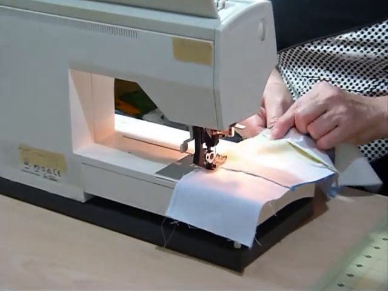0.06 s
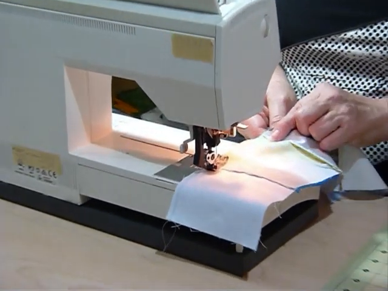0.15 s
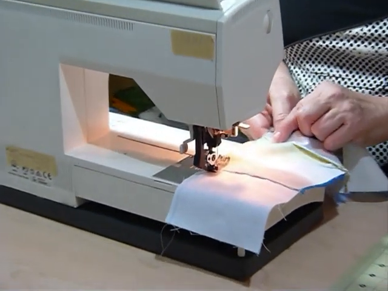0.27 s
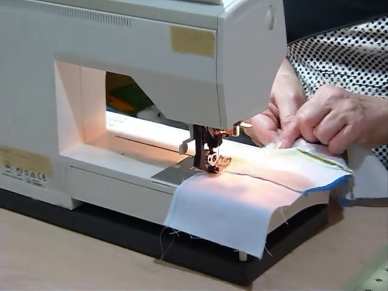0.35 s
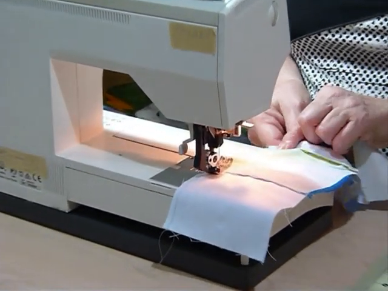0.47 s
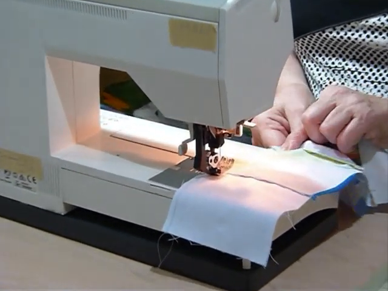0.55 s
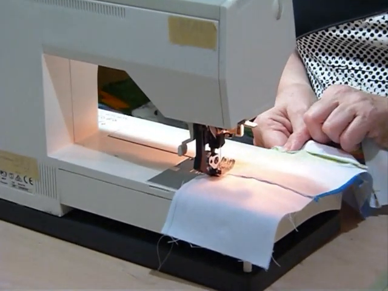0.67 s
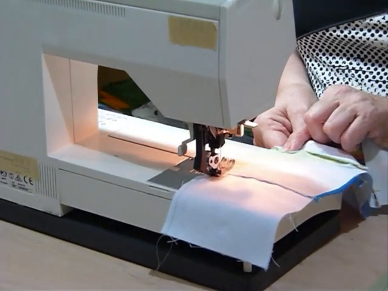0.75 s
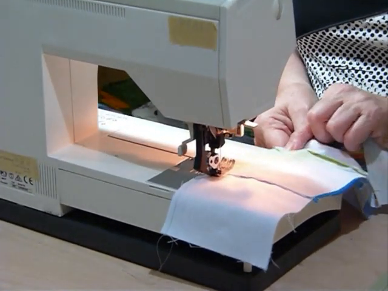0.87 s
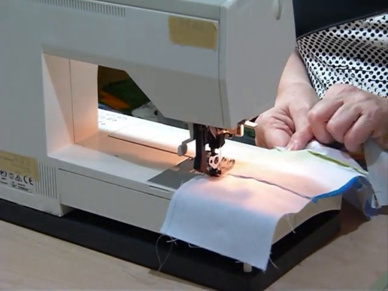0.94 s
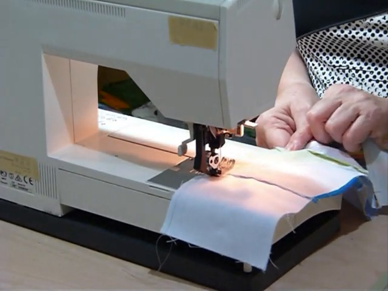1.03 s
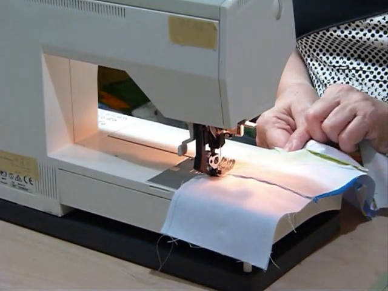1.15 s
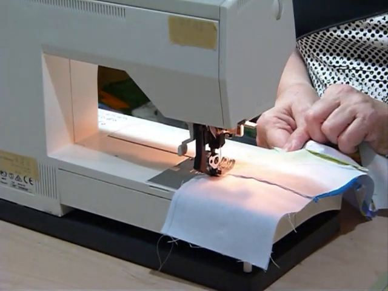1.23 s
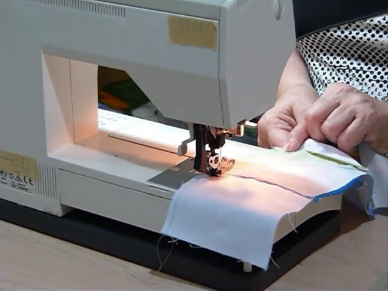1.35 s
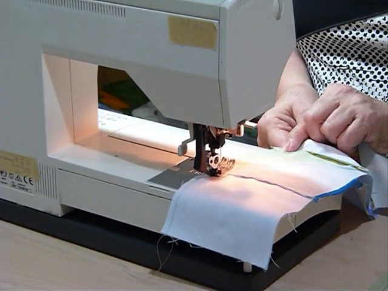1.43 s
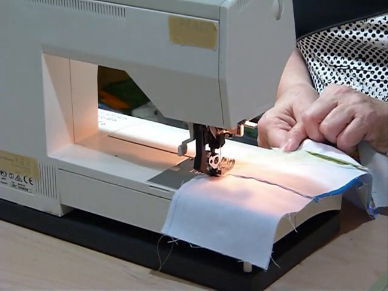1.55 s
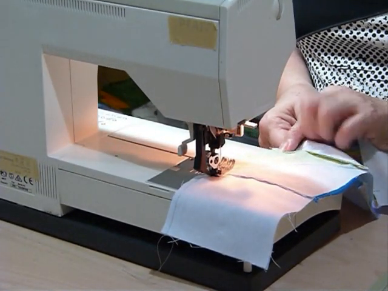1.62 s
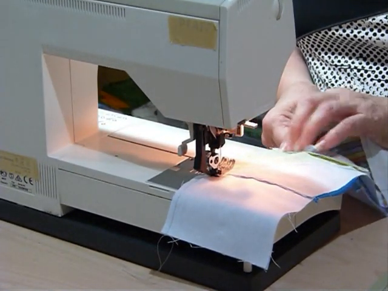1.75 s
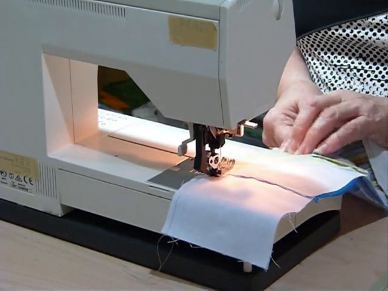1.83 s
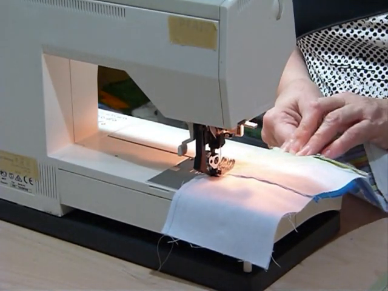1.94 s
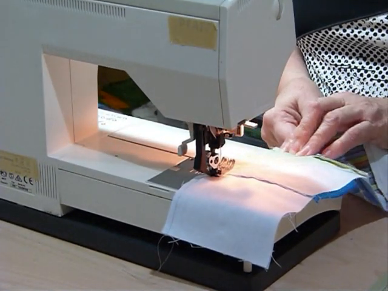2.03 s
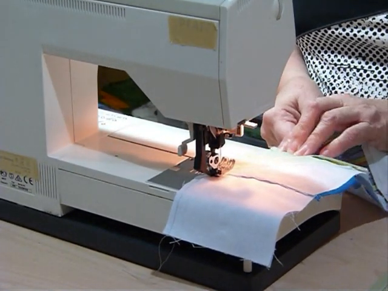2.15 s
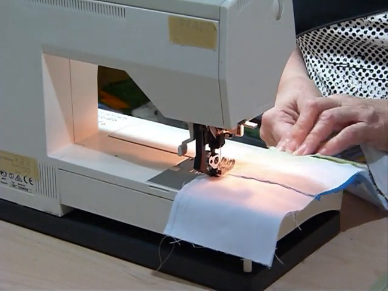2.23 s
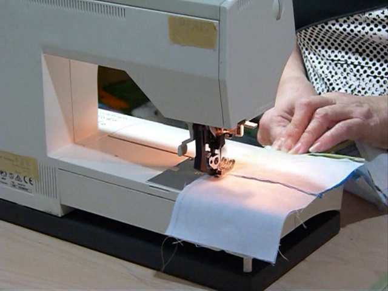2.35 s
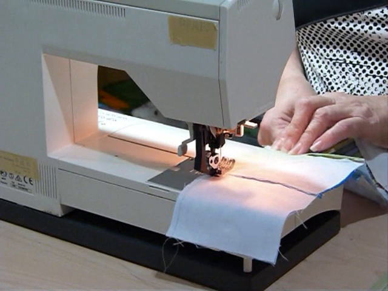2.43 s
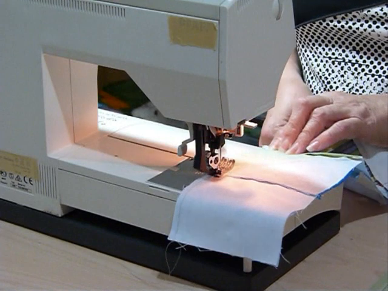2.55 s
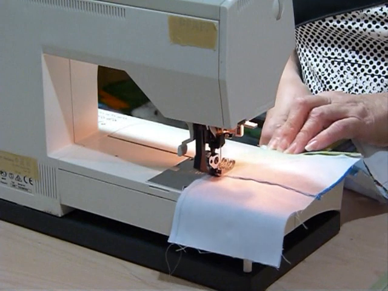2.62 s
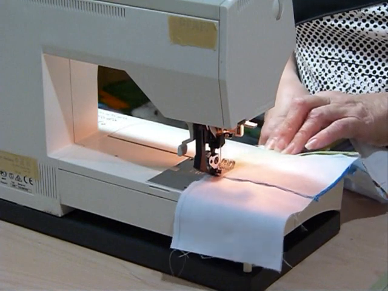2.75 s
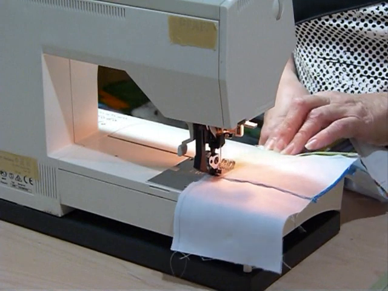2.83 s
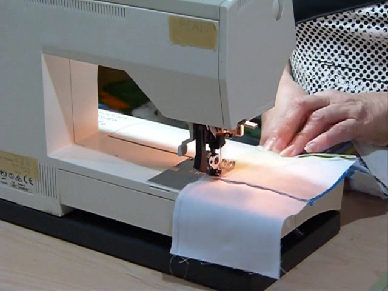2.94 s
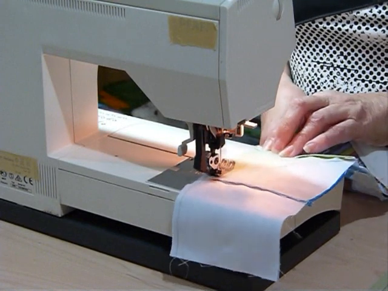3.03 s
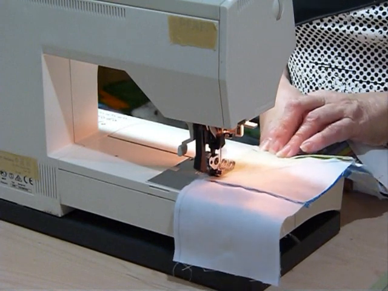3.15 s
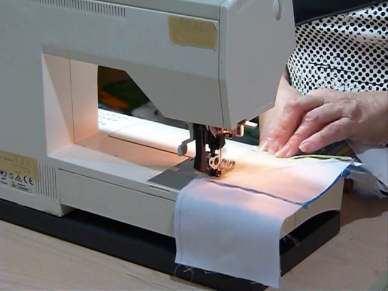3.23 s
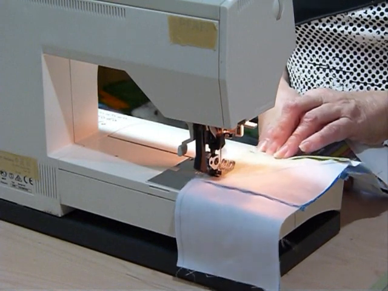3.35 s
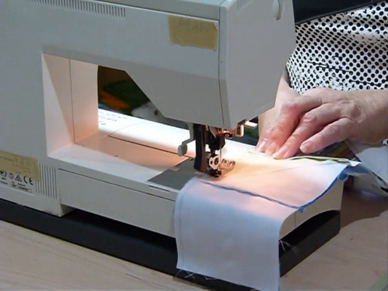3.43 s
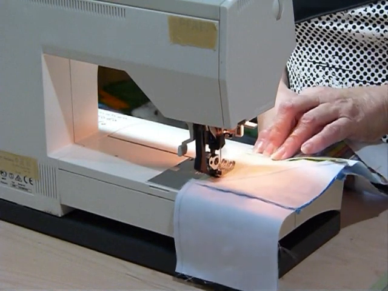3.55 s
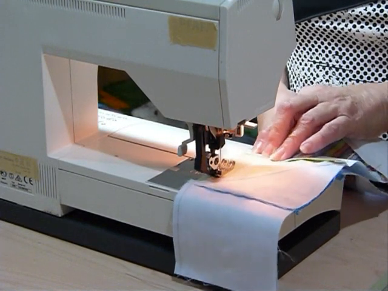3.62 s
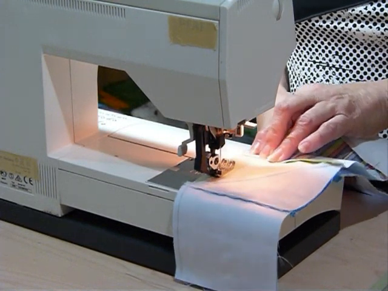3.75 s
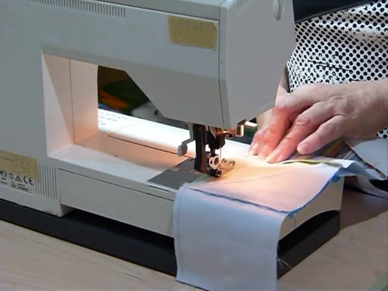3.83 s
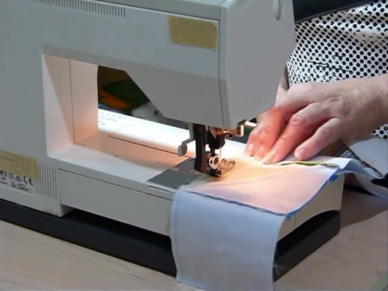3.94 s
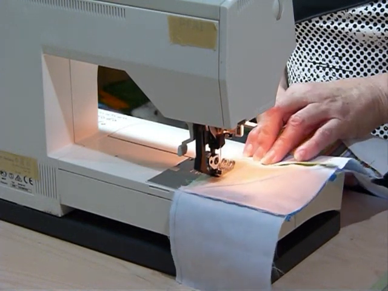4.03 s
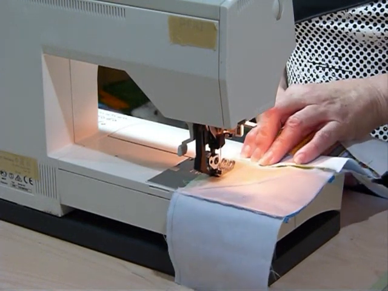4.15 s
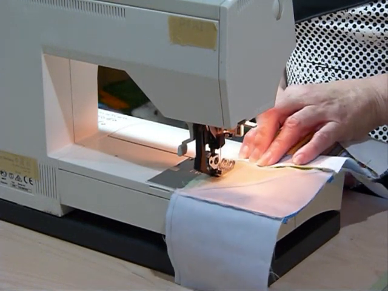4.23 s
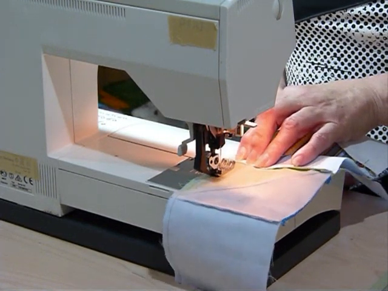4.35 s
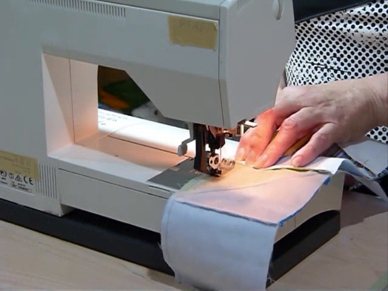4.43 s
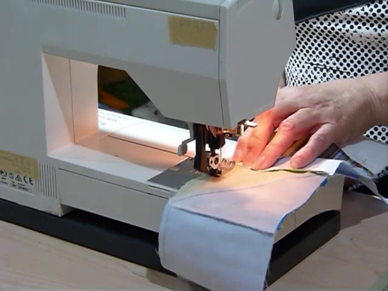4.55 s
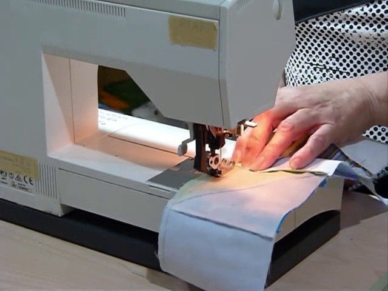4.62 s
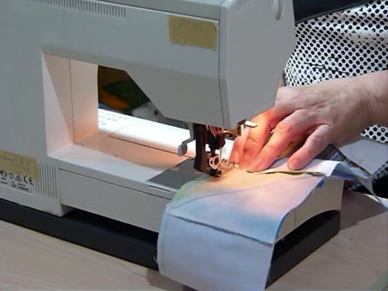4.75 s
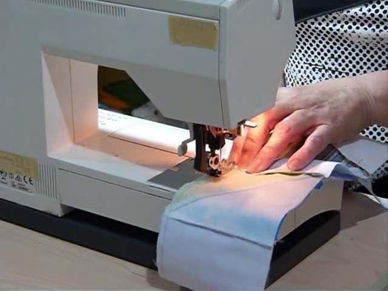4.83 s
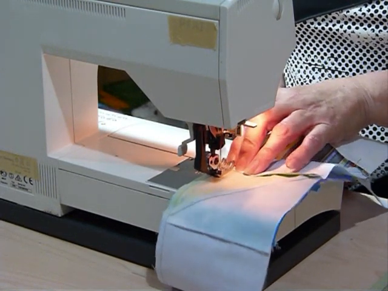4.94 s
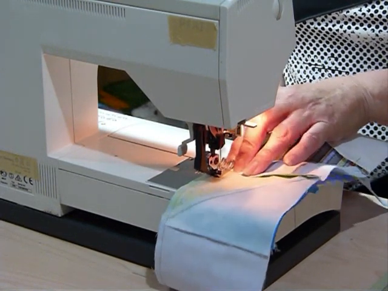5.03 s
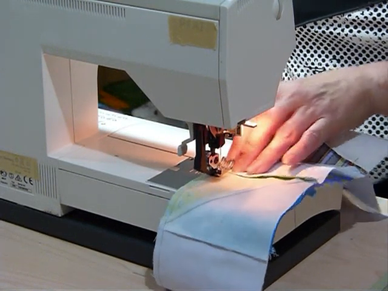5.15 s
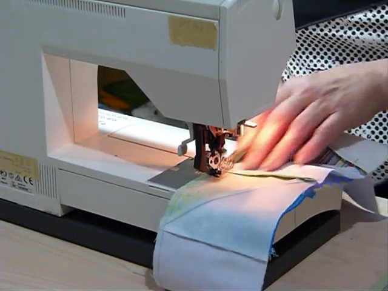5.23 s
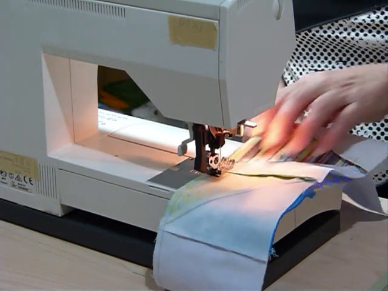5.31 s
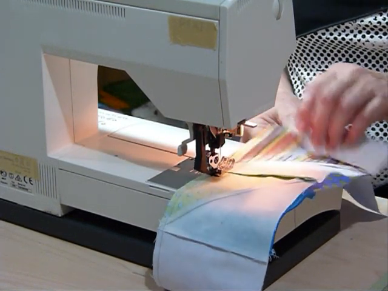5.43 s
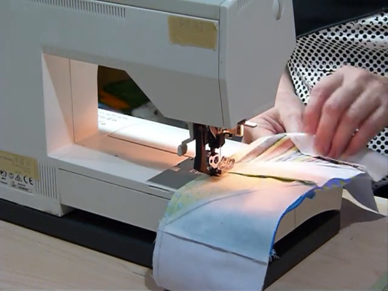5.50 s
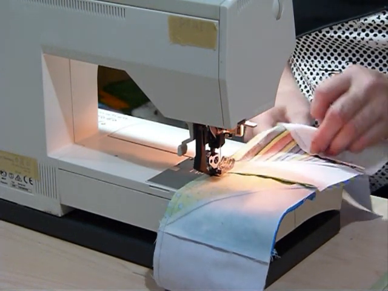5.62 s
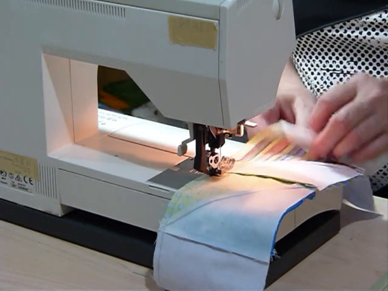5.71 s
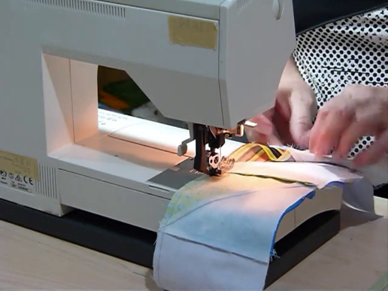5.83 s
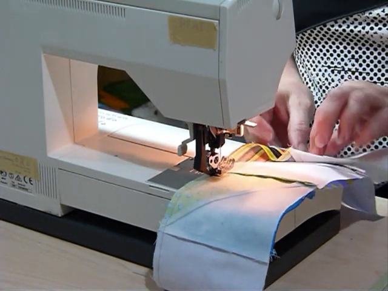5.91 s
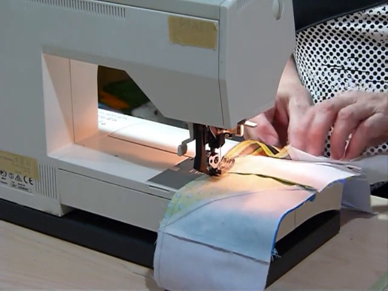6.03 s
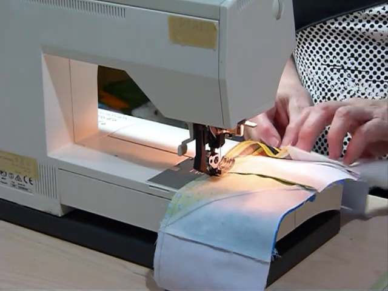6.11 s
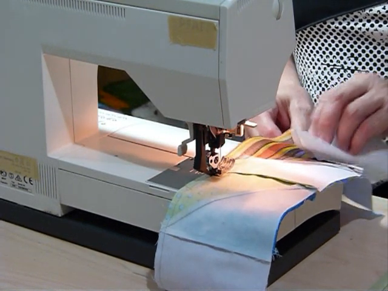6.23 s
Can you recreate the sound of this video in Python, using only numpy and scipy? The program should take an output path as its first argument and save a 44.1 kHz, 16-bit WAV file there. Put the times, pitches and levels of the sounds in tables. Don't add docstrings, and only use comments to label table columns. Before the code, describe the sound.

In a quiet room, hands shift cloth with soft rustles, a rapid faint ticking like a pin over ribs, and small knocks on metal. An electric sewing machine at arm's length groans, then hammers through one fast, steady run of stitches with motor whirr, metallic rattle and thin whine. It slows, clunks to a stop with a short thread hiss, and quiet fabric movement returns. Close stereo microphones, slight room reflections.

```python
import sys
import numpy as np
from scipy import signal
from scipy.fft import rfft, irfft, next_fast_len
from scipy.io import wavfile
from scipy.ndimage import uniform_filter1d

SR = 44100
rng = np.random.default_rng(int(sys.argv[2]) if len(sys.argv) > 2 else 0)


def invert_db(x):
    u = np.asarray(x, float) / 20
    return 10 ** u


def dump(signal):
    limited = np.clip(np.atleast_2d(signal).T, -1, 1)
    pcm = np.round(limited * 32767).astype(np.int16)
    wavfile.write(sys.argv[1], SR, pcm)


N = 276488
TIME = np.arange(N) / SR
STITCHES = 45


def evened(x):
    return x / np.sqrt(np.mean(x ** 2) + 1e-20)


def evened_at_speed(x):
    return x / x[3 * SR:5 * SR].std()


def read(points, hz):
    f, value = np.transpose(points)
    return np.interp(np.log(hz + 1), np.log(f + 1), value)


def curves(rows, off_db=-60):
    s, *columns = np.transpose(rows)
    gate = np.where((TIME < s[0]) | (TIME > s[-1]), off_db, 0)
    return [np.interp(TIME, s, c) + gate for c in columns]


def band(x, lo_hz, hi_hz):
    return signal.sosfilt(signal.butter(2, [lo_hz, min(hi_hz, SR / 2.2)], "band", fs=SR, output="sos"), x)


def slow_noise(size):
    return evened(uniform_filter1d(rng.standard_normal(N), size=size))


def noise(spectrum, same, patchy_db):
    frames, hz = N // 256 + 5, np.fft.rfftfreq(1024, 1 / SR)
    a, b, c, d, patches = rng.standard_normal((frames, 513, 5)).T
    patches = evened(uniform_filter1d(uniform_filter1d(patches, 10, 0), 8, 1))
    like = np.clip(read(same, hz), -1, 1)[:, None]
    left = a + 1j * b
    right = like * left + np.sqrt(1 - like ** 2) * (c + 1j * d)
    z = np.array([left, right]) * invert_db(read(spectrum, hz)[:, None] + patchy_db * patches)
    return evened(signal.istft(z, nperseg=1024, noverlap=768)[1][:, :N])


def resonate(x, hz, width_hz):
    turn, r = np.exp(2j * np.pi * np.cumsum(hz) / SR), np.exp(-np.pi * width_hz / SR)
    smooth = signal.lfilter([1 - r], [1, -r], x / turn)
    smooth = signal.lfilter([1 - r], [1, -r], smooth)
    return (turn * smooth).real


def rings(modes):
    t = np.arange(SR // 3) / SR
    ring = np.zeros(len(t))
    for k, (hz, db, t60) in enumerate(modes):
        ring += (-1) ** k * invert_db(db - 60 * t / t60) * np.sin(2 * np.pi * hz * t)
    return ring / np.linalg.norm(ring)


def strikes(s, sizes):
    train = np.zeros(N)
    np.add.at(train, np.clip((s * SR).astype(int), 0, N - 1), sizes)
    return train


def struck(train, response):
    return signal.oaconvolve(train, response)[:N]


def reflections(x, t60=0.26, lo_hz=1500):
    size = SR // 2
    taps = rng.choice([-1., 1.], (2, size)) * (rng.random((2, size)) < .05)
    taps *= invert_db(-60 * np.arange(size) / SR / t60)
    taps = band(band(taps, lo_hz, 8100), lo_hz, 6300)
    return signal.fftconvolve(x[None], taps / np.linalg.norm(taps, axis=1)[:, None], axes=1)[:, :N]


# (frequency [Hz], left over right [dB])
NEAR_SIDE = [(60, -1.0), (160, -1.5), (420, -1.0), (1100, -0.5), (2900, 1.5), (7640, 2.0)]
# (frequency [Hz], left lead [rad])
NEAR_LEAD = [(0, 0), (100, -.05), (400, -.2), (1460, -.7), (3300, -.7), (5000, -.4), (7800, 0)]


def ports(pair, side=NEAR_SIDE, lead=NEAR_LEAD):
    size = next_fast_len(N)
    hz = np.fft.rfftfreq(size, 1 / SR)
    left = invert_db(read(side, hz) / 2) * np.exp(.5j * read(lead, hz))
    return irfft(rfft(pair, size) * np.array([left, 1 / left]), size)[:, :N]


# (angle [turn], dull level [dB], sharp level [dB])
CAMS = [(.97, -3, 0), (.06, 0, -12), (.02, -6, -3), (.185, -6, -1), (.23, -3, -3), (.31, -8, -8),
        (.41, -4, -6), (.64, -8, -7), (.78, -6, -8), (.86, -6, -8)]


def machine():
    turns, speed = shaft()
    effort_db, steady_s = motor_effort(), np.clip(TIME - 3, 0, 2)
    hiss_db = effort_db - 6 - 3.5 * (1 - speed) + 0.96 * steady_s
    angle, dull_db, sharp_db = np.transpose(CAMS)
    wear = rng.standard_normal((STITCHES, len(CAMS), 2))
    cams_at = stitch_times(angle, turns)
    lift = puffs(cams_at, sharp_db + 1.9 * wear[..., 1])
    throb = puffs(cams_at, dull_db + 0.59 * wear[..., 0])
    flicker = invert_db(0.43 * slow_noise(300))

    near = casing(turns, cams_at, dull_db + 0.95 * wear[..., 0]) * invert_db(effort_db - 5.5)
    near += table_shake(turns, wear[:, 0, 0]) * invert_db(effort_db + shake_level(speed))
    near += gear(turns) * invert_db(effort_db - 8)
    near += feed_taps(turns) * invert_db(effort_db - 20.5) * speed ** 2
    near += needle_plate() * invert_db(effort_db - 12.5) * speed ** 7.1
    near += shaft_orders(turns, speed) + motor_hum(turns, speed, steady_s)
    near += whine() * invert_db(hiss_db - 1.5) * speed ** 25
    near += hook(lift, flicker) * invert_db(hiss_db - 14.0)
    near += clacks() + snaps() + belt() + thread_release()
    air = hiss(lift, flicker) * invert_db(hiss_db - 3.0)
    air += whirr(turns, throb, flicker) * invert_db(effort_db - 4.5)
    return ports(near + air) + invert_db(-9.5) * reflections(near)


# (time [s], angle since the start [turn])
SHAFT = [(2.2, -.3), (2.33, 0), (2.462, 1), (2.563, 2), (2.641, 3), (2.711, 4), (2.78, 5), (2.8465, 6),
         (2.978, 8), (3.3021, 13), (3.4946, 16), (4.9645, 39), (5.0285, 40), (5.0945, 41), (5.165, 42),
         (5.25, 43), (5.36, 44), (5.5, 44.5)]


def shaft():
    turns = uniform_filter1d(np.interp(TIME, *np.transpose(SHAFT)), size=2600)
    rate = np.gradient(turns)
    return turns, rate / rate.max()


def stitch_times(fraction, turns):
    whole = np.arange(STITCHES)[:, None]
    return np.interp(whole + (fraction + .1) % 1 - .1, turns, TIME).ravel()


# (time [s], whirr level [dB])
EFFORT = [(2.285, -64), (2.344, -29), (2.43, -35), (2.5, -25), (2.56, -26), (2.64, -25.5), (2.96, -24.5),
          (4.37, -25), (4.92, -25), (5.1, -26.5), (5.266, -33), (5.3, -36.5), (5.312, -36.5), (5.34, -40),
          (5.408, -46), (5.488, -46), (5.497, -39.5), (5.72, -60.5)]


def motor_effort():
    return curves(EFFORT)[0]


# (frequency [Hz], level [dB], t60 [s])
CASING = [(500, -0.5, 0.57), (557.4, 3, 0.47), (615, 3.5, 0.54), (653, 5.5, 0.32), (700.4, 4, 0.51),
          (850, 6, 0.17), (898.4, 7.5, 0.12), (1041, 1.5, 0.19), (1128, 6, 0.26), (1230, 6.5, 0.28),
          (1340, 8.5, 0.072), (1360, -10, 0.27), (760, 8.5, 0.31), (1900, -9, 0.035)]


def casing(turns, cams_at, cam_db):
    teeth, bite = rng.random(40), rng.standard_normal(40)
    blows = strikes(cams_at, invert_db(cam_db).ravel())
    blows += strikes(stitch_times(teeth, turns), np.tile(bite, STITCHES))
    return evened_at_speed(band(struck(blows, rings(CASING)), 400, 3700))


# (frequency [Hz], level [dB], t60 [s])
BED = [(281.5, 2.5, 0.3), (325.8, -3.5, 0.5), (393.4, 9, 0.21), (473.8, -2.5, 0.91)]


def table_shake(turns, wear):
    blows = strikes(stitch_times(0.035, turns), invert_db(1.4 * wear))
    return evened_at_speed(band(struck(blows, rings(BED)), 250, 600))


def shake_level(speed):
    warming = np.exp(-np.clip(TIME - 2.75, 0, 9) / 0.14)
    return -9 - 13.5 * np.sqrt(abs(1 - speed)) - 5 * warming


def gear(turns):
    tooth = rng.random(120)
    load = uniform_filter1d(rng.standard_normal((STITCHES, 120)), size=9, axis=0)
    load = load * invert_db(-3.5 * np.cos(2 * np.pi * (tooth - .08)))
    bites = strikes(stitch_times(tooth, turns), load.ravel())
    return evened_at_speed(band(band(bites, 500, 1500), 500, 1500))


# (angle [turn], level [dB])
TAPS = [(0.966, -2.5), (.025, -4), (0.171, -4), (.31, -2.5), (0.406, -1), (.53, -7.5), (.62, -6), (.75, -7),
        (0.847, -5)]


def feed_taps(turns):
    place, tap_db = np.transpose(TAPS)
    lo_hz, hi_hz = 1500, 3070
    t = TIME[:900]
    tap = invert_db(-60 * t / 0.009) * np.cos(np.pi * (lo_hz + hi_hz) * t)
    hits = invert_db(tap_db + 4 * rng.standard_normal((STITCHES, len(TAPS))))
    train = strikes(stitch_times(place, turns), hits.ravel())
    return evened_at_speed(band(struck(train, tap), lo_hz, hi_hz))


def needle_plate():
    return evened(resonate(rng.standard_normal(N), np.full(N, 1868), width_hz=280))


# (order [per turn], level [dB])
SHAFT_ORDERS = [(2, -62), (3, -54), (5, -74), (7, -53), (11, -55.5), (12, -56.5), (13, -50)]


def shaft_orders(turns, speed):
    out = np.zeros(N)
    for order, db in SHAFT_ORDERS:
        out += invert_db(db + 1.0) * speed ** 8 * np.cos(2 * np.pi * order * (turns + rng.random()))
    return out


def motor_hum(turns, speed, steady_s):
    pedal = .5 - 0.52 * np.tanh((TIME - 5.115) / .012)
    level = invert_db(-36 - 0.96 * steady_s) * abs(speed) ** 10.5
    return level * pedal * np.cos(2 * np.pi * 8 * turns)


# (frequency [Hz], level against the hiss [dB])
WHINE = [(5455, -22), (5580, -24), (5637, -21), (5734, -22), (5796, -21), (5878, -15.5), (5958, -25)]


def whine():
    step = 64
    slow = evened(uniform_filter1d(rng.standard_normal((2, len(WHINE), N // step + 1)), size=40))
    wanders, wavers = np.repeat(slow, step, axis=2)[..., :N]
    out = np.zeros(N)
    for (hz, db), wander, waver in zip(WHINE, wanders, wavers):
        out += invert_db(db + 2.5 * waver) * np.cos(2 * np.pi * np.cumsum(hz + 5 * wander) / SR)
    return out


def puffs(s, db):
    t = np.arange(1500) / SR
    puff = 2 * np.exp(-t / 0.0026) * (1 - np.exp(-t / 0.0023))
    return struck(strikes(s, invert_db(db).ravel()), puff)


# (frequency [Hz], level [dB], t60 [s])
HOOK = [(4360, -7.5, 0.015), (5480, -6, 0.015), (5580, -3.5, 0.03), (5920, -5.5, 0.021)]


def hook(lift, flicker):
    return struck(rng.standard_normal(N) * (.5 + lift) * flicker ** 3, rings(HOOK))


# (frequency [Hz], likeness [0-1])
NEAR_SAME = [(60, .99), (420, .97), (1100, .82), (2900, .55), (7640, .7)]
# (frequency [Hz], level [dB per Hz])
HISS = [(880, -19.5), (1500, -2), (1680, -1.5), (1860, -1), (2180, -4.5), (3180, -4.5), (5210, -9.5),
        (5740, -10), (7070, -12), (7900, -30.5), (10300, -58.5), (17400, -120)]


def hiss(lift, flicker):
    return noise(HISS, NEAR_SAME, patchy_db=.8) * (1 + 0.65 * lift) * flicker


# (frequency [Hz], level [dB per Hz])
WHIRR = [(25, -37), (45, -29), (65, -32), (110, -12), (160, -12), (230, -19.5), (300, -1), (360, -7),
         (480, -0.5), (1130, -1), (1400, -2), (1600, -13.5), (2600, -13.5), (3400, -35)]


def whirr(turns, throb, flicker):
    downstroke = invert_db(3 * np.cos(2 * np.pi * (turns - .08)))
    return noise(WHIRR, NEAR_SAME, patchy_db=1.0) * flicker * (1 + 0.14 * throb) * downstroke


# (angle [turn], peak level [dB])
BITE = [(5, -16), (12, -11), (13, -11), (25, -12), (26, -19.5), (41, -24)]
# (angle [turn], extra level [dB])
SEAMS = [(5, 0.5), (6, -7), (10, 6.5), (11, -13), (12, -3.5), (13, 5.5), (14, -17), (15, 2.5), (18, 6),
         (19, -6), (20, -7), (21, -6), (22, 1.5), (24, 2), (25, 4), (26, -19.5), (27, -8), (29, 14),
         (30, -8), (31, -8), (33, -2.5), (34, 2), (38, 8), (39, 7)]
# (angle [turn], lag [s])
CLACK_DELAY = [(5, 0), (7, .008), (10, .004), (12, 0)]
# (time [s], peak level
# [dB], brightness [dB])
MORE_CLACKS = [(2.3, -29, -13.5), (2.355, -29, -21), (2.33, -36.5, 1), (2.341, -30, -12), (2.346, -20, -23),
               (2.381, -20.5, -12), (2.422, -30.5, 3), (2.467, -9, -18), (2.496, -7.5, -20), (2.565, -21.5, -7),
               (2.611, -12, -17.5), (2.646, -12, -12), (2.699, -24, -31), (2.725, -18, -6.5), (3.185, -19, -11),
               (3.202, -17.5, -1.5), (3.636, -10.5, -19.5), (3.779, -11, -25.5), (4.187, -19.5, 0.5),
               (5.119, -12, -7.5), (5.192, -16, -10.5), (5.216, -17.5, -14), (5.259, -32, -4), (3.879, -9, -14.5),
               (3.971, -17, -26), (4.309, -21, -20), (4.772, -14.5, -7), (3.021, -18.5, -22), (2.938, -13, -11)]


def clack_rows():
    turn = np.arange(5, 42)
    db = np.interp(turn, *np.transpose(BITE))
    for seam, extra_db in SEAMS:
        db = db + extra_db * (turn == round(seam))
    s = np.interp(turn, *np.transpose(SHAFT)[::-1]) + 0.002 + np.interp(turn, *np.transpose(CLACK_DELAY))
    edge_db = -28 + 1.5 * rng.standard_normal(len(turn))
    return np.r_[np.c_[s, db, edge_db - db], MORE_CLACKS]


def clacks():
    out, t = np.zeros(N), np.arange(1800) / SR
    edge_lead = 130
    rows = clack_rows()
    grit = rng.standard_normal((len(rows), 2, len(t)))
    fall = np.minimum(t / 0.0032, 1) * invert_db(-60 * t / 0.035) + 0.16 * invert_db(-60 * t / 0.1)
    snap = 0.4 * np.exp(-((t - .003) / 0.001) ** 2)
    for (s, db, bright_db), (dull, sharp) in zip(rows, grit):
        sound = evened(band(dull, 680, 1450)) * np.roll(fall, edge_lead)
        sound += invert_db(bright_db) * evened(band(sharp, 2800, 5600)) * (fall ** 0.59 + snap)
        out[round(s * SR) - 110 - edge_lead:][:len(t)] += invert_db(db - 8.5) * sound
    return out


# (time [s], peak level [dB])
SNAPS = [(2.7813, -28.5), (2.9253, -27), (3.0555, -15), (3.188, -13), (3.3653, -19.5), (3.4295, -18.5),
         (3.5553, -21), (3.6232, -29), (3.8576, -17.5), (3.94, -29), (4.0056, -23.5), (4.0811, -21),
         (4.1769, -28), (4.2587, -23), (4.3248, -21), (4.7082, -23.5), (4.9117, -15), (5.0968, -25),
         (5.4905, -27), (5.502, -36), (.542, -42), (.5455, -41), (.549, -45), (2.3365, -28), (2.458, -26),
         (3.043, -25), (3.491, -22), (3.684, -28), (3.7474, -30), (3.8267, -22), (4.133, -30),
         (4.4518, -20), (4.58, -29.5), (4.8993, -21), (5.1911, -32), (5.2584, -28.5)]


def snaps():
    out, t = np.zeros(N), np.arange(1200) / SR
    for (s, db), grit in zip(SNAPS, rng.standard_normal((len(SNAPS), len(t)))):
        fall = np.minimum(t / 0.00068, 1) * invert_db(db - 10 - 60 * t / 0.03)
        out[round(s * SR) - 30:][:len(t)] += fall * evened(band(grit, 3300, 6800))
    return out


# (time [s], pitch [Hz], level [dB])
BELT = [
    [(2.285, 630, -56), (2.31, 653, -35.5), (2.33, 600, -40.5), (2.36, 716, -30.5), (2.42, 648, -37),
     (2.55, 908, -33)],
    [(5.12, 980, -42), (5.18, 850, -38.5), (5.23, 714, -31.5), (5.27, 632, -51), (5.295, 600, -48),
     (5.32, 600, -39), (5.355, 480, -52), (5.4, 253, -43.5), (5.48, 230, -53)],
    [(5.55, 1900, -78), (5.68, 1780, -60.5), (5.95, 1850, -70.5)],
    [(0, 1140, -63), (.5, 1130, -64), (.7, 1073, -65.5)],
]


def belt():
    out = np.zeros(N)
    for rows in BELT:
        s, hz, db = np.transpose(rows)
        groan = evened(resonate(rng.standard_normal(N), np.interp(TIME, s, hz), .45 * hz.mean()))
        out += groan * invert_db(curves(np.c_[s, db])[0])
    return out


def thread_release():
    start_s, fall_s = 5.492, 0.038
    fall = (TIME > start_s) * np.exp(-abs(TIME - start_s) / fall_s)
    return invert_db(-44.5) * fall * evened(band(rng.standard_normal(N), 2600, 6500))


# (time [s], peak level [dB], pitch [Hz], brightness [dB])
KNOCKS = [(0.07, -41, 315, -4), (0.256, -40, 357, -16), (0.359, -42, 292, -5), (0.542, -35.5, 1120, 0),
          (0.5515, -26, 823, -26), (.5485, -31, 2540, -11), (0.549, -22.5, 1226, -6.5),
          (1.6109, -29, 350, -3.5), (1.611, -32, 847, -8), (1.62, -29.5, 316, -17), (1.634, -35, 800, -16),
          (1.744, -42, 633, -13), (1.929, -25, 500, -10.5), (1.953, -30, 582, -28), (1.978, -37, 550, -24),
          (2.064, -36, 495, -23), (2.095, -34, 241, -21), (5.195, -27.5, 1210, 8.5), (5.258, -31, 650, 9),
          (5.3045, -15.5, 570, -27), (5.318, -20.5, 763, -21), (5.331, -25.5, 297, -25),
          (5.403, -29, 292, -24), (5.266, -22, 665, -19), (5.352, -22.5, 655, -24), (5.385, -29, 500, -14),
          (5.559, -30.5, 1080, -8), (6.0355, -27.5, 1230, -27), (6.037, -38, 1900, -20),
          (6.045, -42, 1500, -18), (6.0341, -29.5, 450, -25), (6.039, -28, 640, -25),
          (6.046, -28.5, 323, -23), (6.062, -28, 600, -22), (6.07, -30, 612, -24), (6.078, -37, 600, -19),
          (6.175, -41, 694, -20), (6.19, -42, 780, -20), (6.209, -49, 770, -17)]
# (time [s], peak level [dB], pitch [Hz])
BUMPS = [(.36, -46, 600), (1.939, -32, 380), (2.311, -38, 127), (2.341, -29.5, 196), (2.401, -36, 131),
         (2.471, -30.5, 201), (2.561, -29.5, 191), (5.152, -35, 126), (5.205, -28, 248),
         (5.313, -34.5, 123), (5.373, -29, 252), (5.398, -31, 256), (0.335, -42, 293), (5.459, -42, 129),
         (5.554, -38.5, 123), (6.049, -36, 116)]


def knocks():
    out, t = np.zeros((2, N)), np.arange(6000) / SR
    rows = [(s, db, hz, 0.083 * (450 / hz) ** 0.59, bright_db) for s, db, hz, bright_db in KNOCKS]
    rows += [(s, db, hz, .19, -31) for s, db, hz in BUMPS]
    pan_db = np.array([[-0.75], [0.75]])
    rise = np.minimum(t / 0.0018, 1)
    grit = rng.standard_normal((len(rows), 2, len(t)))
    for (s, db, hz, t60, bright_db), (body, crack) in zip(rows, grit):
        ring = 0.62 * np.sin(2 * np.pi * hz * t) + 0.38 * evened(band(body, 0.62 * hz, 1.36 * hz))
        sound = ring * invert_db(-60 * t / np.clip(t60, .02, .6))
        crack = evened(band(crack, 740, 3230) + 0.24 * band(crack, 3400, 5700))
        sound += invert_db(bright_db) * crack * invert_db(-60 * t / 0.029)
        part = out[:, round(s * SR) - 20:][:, :len(t)]
        part += invert_db(db - 4.5 + pan_db) * (rise * sound)[:part.shape[1]]
    out += ticks()
    return out + invert_db(-14.5) * reflections(out.mean(0), t60=0.29, lo_hz=600)


# (time [s], peak level [dB], pitch [Hz])
TICKS = [(0.0662, -45, 2600), (.074, -50, 2600), (.085, -47, 2900), (0.0902, -46, 2600), (.094, -50, 1200),
         (0.129, -47, 2330), (.134, -46, 2330), (.149, -48, 1900), (.186, -50, 1150), (.279, -49, 1050),
         (.192, -47, 1200), (.208, -52, 1200), (0.2349, -46, 1800), (0.2897, -47, 2160), (0.301, -49, 2300),
         (0.3162, -44, 1500), (.34, -49, 2500), (.3885, -51, 1750), (0.402, -46, 2200), (.4584, -51, 2290),
         (0.4858, -44, 1900), (.595, -53, 2300), (0.625, -53, 2300), (.648, -59, 1630)]


def ticks():
    out, t = np.zeros(N), np.arange(1200) / SR
    first_s, gap_s, count = .0105, .01398, 47
    ribs, size = rng.standard_normal((count, 2, len(t))), rng.standard_normal(count)
    for k, (low, high) in enumerate(ribs):
        click = evened(band(low, 900, 1300)) + evened(band(high, 1700, 3000))
        fall = np.minimum(t / 0.0006, 1) * invert_db(-55 + size[k] - 60 * t / 0.017)
        out[round((first_s + k * gap_s) * SR) - 40:][:len(t)] += fall * click
    fall = np.minimum(t / 0.0008, 1) * invert_db(-60 * t / 0.025)
    for (s, db, hz), scratch in zip(TICKS, rng.standard_normal((len(TICKS), len(t)))):
        scratch = band(band(scratch, 0.79 * hz, 1.28 * hz), 0.79 * hz, 1.28 * hz)
        out[round(s * SR) - 40:][:len(t)] += invert_db(db - 2) * fall * evened(scratch)
    return out * invert_db(np.array([[1.5], [-1.5]]))


# (frequency [Hz], likeness [0-1])
ROOM_SAME = [(60, 0.79), (160, 1), (420, 0.88), (1100, 0.76), (2900, 0.16), (7640, 0.47)]
# (time [s], pressure level [dB])
FABRIC = [
    [(0.0, -55), (0.48, -53.5), (0.62, -54.5), (0.73, -70), (0.9, -56.5), (0.97, -58.5), (1.22, -51),
     (1.33, -51.5), (1.42, -56), (1.55, -55.5), (1.62, -45.5), (1.74, -51), (1.9, -49.5), (2.0, -48.5),
     (2.17, -49), (2.3, -46)],
    [(5.45, -47.5), (5.598, -47.5), (5.806, -59), (6.02, -60), (6.052, -51), (6.15, -56), (6.19, -51),
     (6.27, -59)],
]
# (frequency [Hz], level [dB per Hz])
DRAG = [(71, -51), (120, -25.5), (177, -10), (206, -3.5), (408, -7.5), (443, -4.5), (2000, -16),
        (2600, -61), (4400, -120)]
# (frequency [Hz], level [dB per Hz])
RUSTLE = [(760, -34), (1300, -7.5), (2140, -0.5), (3940, -1), (6350, -5), (7330, -11), (7900, -36.5),
          (10300, -65), (17400, -120)]


def fabric():
    drag, rustle = noise(DRAG, ROOM_SAME, 2.5), noise(RUSTLE, ROOM_SAME, 1.2)
    rustle *= invert_db(0.64 * slow_noise(200))
    out = np.zeros((2, N))
    for rows in FABRIC:
        drag_db = curves(rows)[0]
        moving = (TIME >= rows[0][0]) & (TIME <= rows[-1][0])
        rustle_db = np.where(moving, drag_db - 6.5, drag_db)
        out += invert_db(drag_db - 4.5) * drag + invert_db(rustle_db - 0.2) * rustle
    return out


# (start [s], length [s], level [dB])
DRONE = [(-.1, 0.45, -61), (.25, 0.16, -64), (0.515, 0.18, -63), (0.89, 0.46, -60), (1.2, 0.42, -61),
         (1.583, 0.36, -52.5), (1.98, 0.14, -75)]


def drone():
    level = invert_db(-71)
    for s, length, db in DRONE:
        level = level + invert_db(db) * np.sin(np.pi * np.clip((TIME - s) / length, 0, 1)) ** 0.44
    hz = 173.7 + 0.94 * slow_noise(9000)
    return level * np.sin(2 * np.pi * np.cumsum(hz) / SR)


# (frequency [Hz], level [dB], waver [dB])
HUM = [(48.4, -64.5, .4), (86.1, -64.5, 1.5), (242.2, -70, 1.5)]


def hum():
    out = np.zeros(N)
    for hz, db, waver_db in HUM:
        out += invert_db(db + 3.0 + waver_db * slow_noise(6000)) * np.sin(2 * np.pi * hz * TIME)
    return out


# (frequency [Hz], level [dB per Hz])
ROOM = [(20, -51), (40, -21.5), (70, -21.5), (110, -8.5), (200, -12), (400, -13.5), (800, -17.5),
        (1050, -13), (1500, -20), (3000, -27), (6500, -29), (7300, -35), (7900, -46), (10000, -92)]
# (frequency [Hz], left over right [dB])
ROOM_SIDE = [(60, -1.5), (200, -1.0), (680, 0), (2270, -1.5), (7640, 1)]
# (frequency [Hz], left lead [rad])
ROOM_LEAD = [(0, 0), (100, -.1), (400, -.35), (1210, -.9), (2150, -3), (3530, -2.5), (5510, -1), (7840, .5)]


def room():
    air = invert_db(-57) * noise(ROOM, ROOM_SAME, patchy_db=1.6)
    return ports(air + hum() + drone() + fabric(), ROOM_SIDE, ROOM_LEAD)


def scene():
    return machine() + knocks() + room()


def band_limit(x):
    return signal.sosfilt(signal.butter(12, 7930, fs=SR, output="sos"), x)


def record(dry):
    edge = signal.firwin(401, 7700, window=("kaiser", 8), fs=SR)
    mix = signal.oaconvolve(dry, edge[None], "same")
    return band_limit(mix)


dry = scene()
out = record(dry)
dump(out)
```